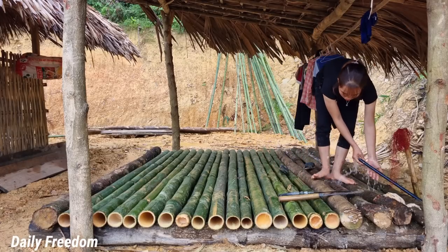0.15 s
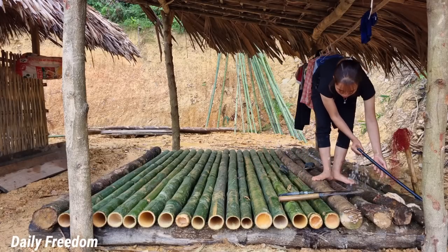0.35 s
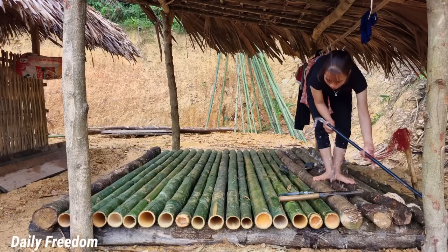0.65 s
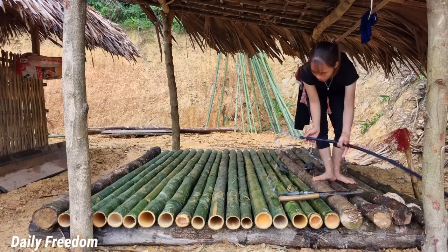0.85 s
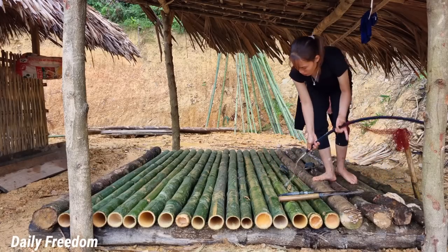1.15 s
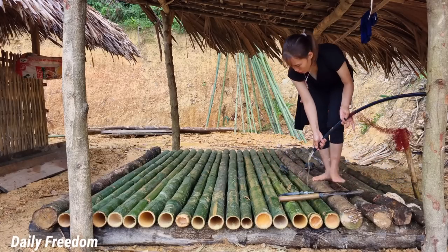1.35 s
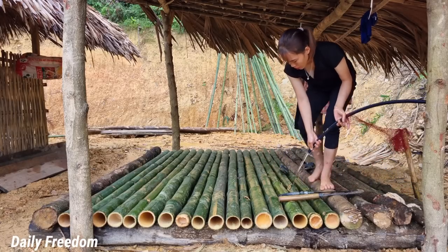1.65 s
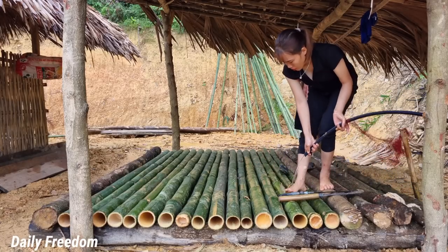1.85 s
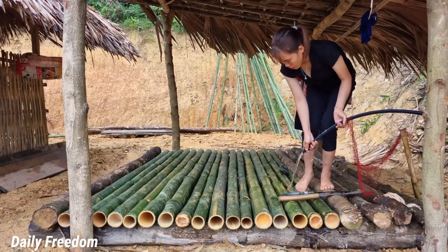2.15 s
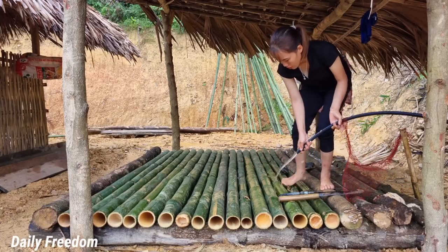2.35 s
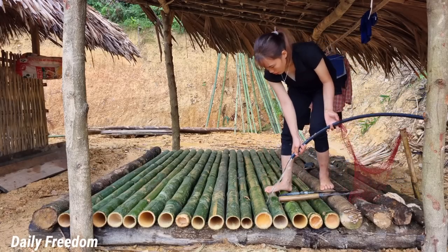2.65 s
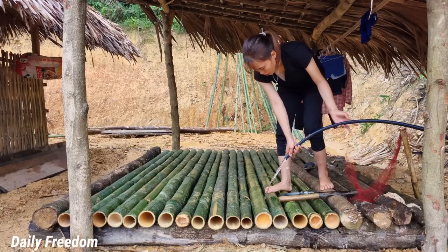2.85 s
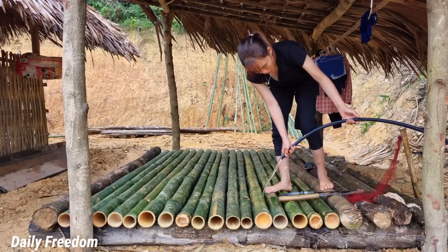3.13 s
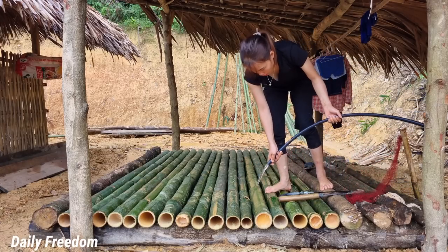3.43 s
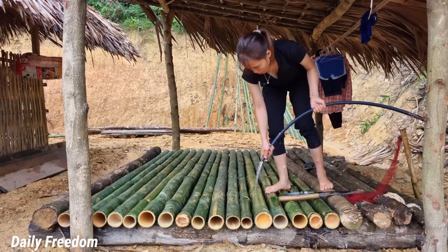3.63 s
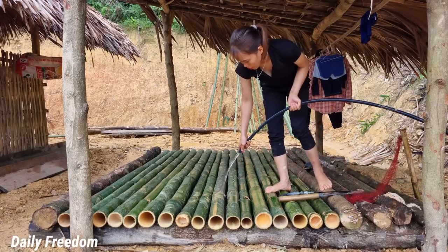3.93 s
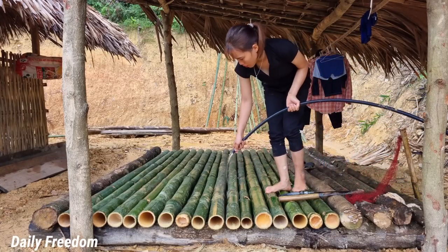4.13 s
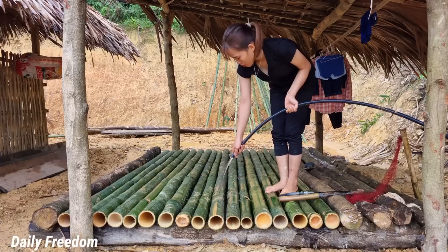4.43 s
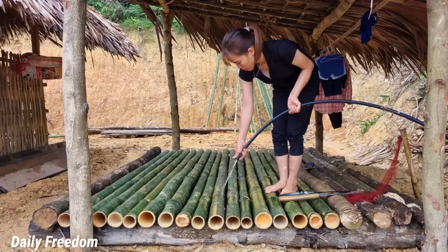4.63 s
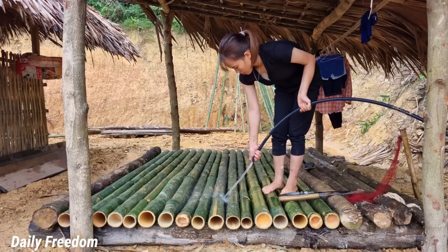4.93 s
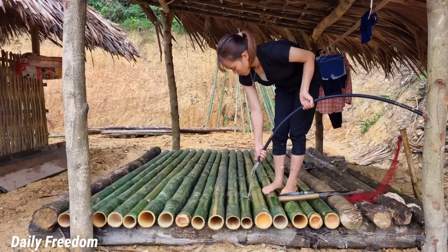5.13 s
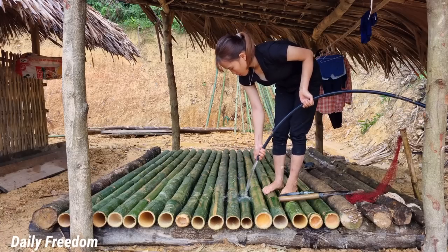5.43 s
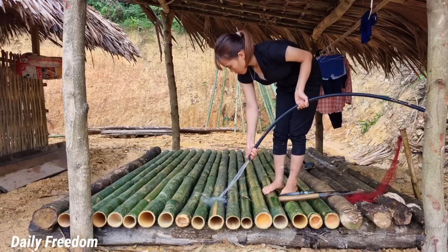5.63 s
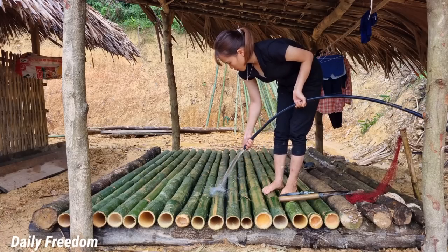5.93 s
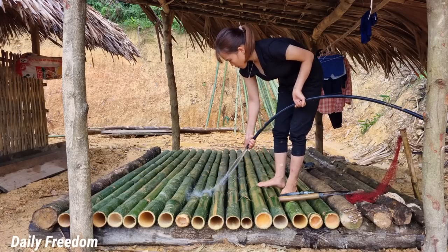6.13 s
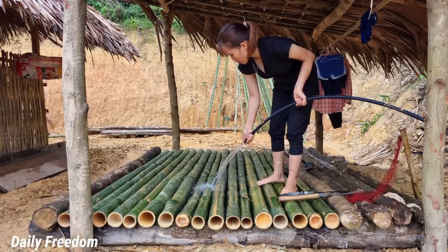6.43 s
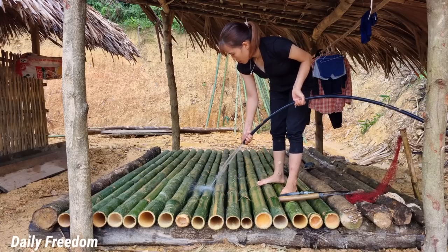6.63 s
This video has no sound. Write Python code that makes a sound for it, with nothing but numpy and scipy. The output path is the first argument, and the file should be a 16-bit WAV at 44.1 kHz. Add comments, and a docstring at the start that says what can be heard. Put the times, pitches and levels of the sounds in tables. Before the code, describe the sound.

Soft, unsteady water spray on hollow bamboo, outdoors and dry, heard from nearby in stereo. It starts thin and quiet, with droplets, tiny gurgles and watery plinks. Short low bumps from shifting feet sound near one second, and the heaviest thud near two. The jet swells just before four seconds, thins again, then from about five seconds turns brighter and spits rapid crisp slaps and narrow squirts until the end.

```python
"""A hose jet hisses and patters over a floor of whole bamboo poles under a thatched shelter.
The spray is shaped noise with droplet and gurgle tones; the poles drum as resonating noise.
Bubbles plink as gliding sines, squirts are narrow hiss, slaps of water are cracks with a splash.
Bare feet shift on the hollow poles and knock them in short, dull tones; the thatch adds scatter."""
import sys
import numpy as np
from scipy import signal
from scipy.fft import rfft, irfft
from scipy.io import wavfile
from scipy.ndimage import uniform_filter1d

SR = 44100
rng = np.random.default_rng(int(sys.argv[2]) if len(sys.argv) > 2 else 0)


def persist_wave(psi):
    """Save psi, clipped to +-1, as 16-bit WAV."""
    counts = np.round(np.clip(psi, -1, 1) * 32767).astype(np.int16)
    wavfile.write(sys.argv[1], SR, np.atleast_2d(counts).T)


N = 298557  # length in samples

REST_DB = -55  # resting force of the jet


def amp(db):
    """Turn decibels into a plain multiplier."""
    return 10 ** (np.asarray(db) / 20)


def evened(x):
    """Scale a sound to an rms (average strength) of 1."""
    return x / np.sqrt(np.mean(x ** 2) + 1e-20)


def read(points, hz):
    """Read a table of (Hz, value) at any pitch, with pitch on a logarithmic scale."""
    f, value = np.transpose(points)
    return np.interp(np.log(hz + 1), np.log(f + 1), value)


def curves(rows, t):
    """Join the rows of a table with straight lines over time, one curve per column."""
    seconds, *columns = np.transpose(rows)
    return [np.interp(t, seconds, column) for column in columns]


def add(mix, s, sound):
    """Lay a sound into the mix at s seconds, cut off at the end."""
    part = mix[:, round(s * SR):][:, :sound.shape[1]]
    part += sound[:, :part.shape[1]]


def sides(pan_db):
    """Left and right multipliers; a positive pan makes the left louder."""
    return amp(np.array([pan_db / 2, -pan_db / 2]))


def filtered(x, order, edge_hz, kind):
    """Keep only the part of a sound that lies on the wanted side of the edges."""
    return signal.sosfilt(signal.butter(order, edge_hz, kind, fs=SR, output="sos"), x)


def resonance(x, hz, width):
    """Let one pitch ring out of a sound, as a hollow does; width in Hz."""
    return signal.lfilter(*signal.iirpeak(hz, hz / width, SR), x)


# How alike the noise is on the left and right.
# Each row: pitch in Hz, likeness from 0 to 1.
LIKENESS = [(60, 0.5), (130, 0.91), (290, 0.71), (640, 0), (1400, 0), (3100, 0.29), (15000, 0.)]


def pair_noise():
    """Two channels of noise, most alike in the bass and mostly unrelated in the treble."""
    a, b = rfft(rng.standard_normal((2, N)))
    same = np.clip(read(LIKENESS, np.fft.rfftfreq(N, 1 / SR)), 0, 1)
    right = same * a + np.sqrt(1 - same ** 2) * b
    return evened(irfft([a, right], N))


def grains(per_s, spread_db, lo_hz, hi_hz, cycles, rise, lag_s, count):
    """Sparse trains of short dying tones; each kind comes from its own side, a few are large."""
    size = amp(spread_db * np.minimum(rng.exponential(1, N), 5))
    size *= rng.random(N) < per_s / SR
    kind = rng.integers(0, count, N)
    out = np.zeros((2, N))
    for k, hz in enumerate(np.geomspace(lo_hz, hi_hz, count)):
        u, v, w = rng.random(3)
        starts = np.array([[lag_s * 2 * u + 0.0002506], [2e-4]])  # the left side starts later
        turns = hz * (np.arange(2400) / SR - starts).clip(0)
        life = turns / (cycles * (.5 + v))
        tone = life * np.exp(-3 * life) * np.sin(2 * np.pi * turns * (1 + rise * life))
        tone *= sides(4.3 * (w - .5))[:, None] / np.linalg.norm(tone[1])
        out += signal.oaconvolve((size * (kind == k))[None], tone, axes=1)[:, :N]
    return evened(out)


# The jet on the poles.
# Each row: time in seconds, force in dB, fineness of the mist in dB.
JET_FORCE = [(0.0, -49.5, -8), (0.19, -53, -4.5), (0.24, -50, -4.5), (0.3, -52.5, -4), (0.5, -52.5, -5.5),
             (0.74, -53.5, -7.5), (0.813, -51, -1), (0.94, -52.5, -7), (1.03, -50.5, -4), (1.1, -49, -2.5),
             (1.2, -47, -7), (1.236, -48.5, -5), (1.437, -54.5, -5.5), (1.6, -53.5, -7), (1.64, -54, -3.5),
             (1.81, -53.5, -8.5), (1.91, -47.5, -5.5), (2.13, -55.5, -6.5), (2.4, -54.5, -7.5),
             (2.461, -52, -1.5), (2.516, -53.5, -8), (2.673, -48.5, -5), (2.795, -53.5, -6),
             (3.09, -56, -6), (3.204, -52, -2.5), (3.368, -52.5, -5.5), (3.603, -48, -3.5),
             (3.807, -43.5, -3.5), (4.023, -47, -2.5), (4.081, -54, -3), (4.152, -57.5, -6.5),
             (4.28, -50.5, -7), (4.481, -55, -5), (4.644, -55, -8.5), (4.82, -55, -6), (4.865, -50.5, -7),
             (4.885, -48.5, 4), (4.91, -43, 1), (4.997, -44, 1.5), (5.062, -53, -4), (5.24, -55, -7),
             (5.34, -45.5, -5.5), (5.425, -49, -6.5), (5.47, -48, 1), (5.589, -46, 1.5), (5.624, -48, -8),
             (5.657, -48.5, 1), (5.738, -46.5, -1), (5.804, -54.5, -7), (5.869, -50.5, -4.5),
             (5.92, -43.5, -3), (5.988, -48.5, -2.5), (6.087, -44.5, -6), (6.13, -49.5, -2),
             (6.24, -43.5, -0.5), (6.304, -50.5, 0), (6.367, -46, -8), (6.4, -48, 0), (6.486, -45, -1),
             (6.77, -45, -2.5)]
# Tone colour of the spray within its low, middle and high bands.
# Each row: pitch in Hz, relative level per Hz in dB.
SPRAY_COLOUR = [(450, -3.5), (650, -7), (850, -11.5), (1100, -3), (1600, -4.5), (2300, -3), (3000, -1.5),
                (5000, -0.5), (6800, -2.5), (7700, 0), (8600, -2.5), (11500, -4), (14700, -2), (15600, -1)]
# Form of the stream.
# Each row: time in seconds, share landing as separate droplets from 0 to 1,
# level of the low band at resting force in dB.
STREAM_FORM = [(0, 0.07, -61.5), (.5, 0.15, -57.5), (1, 0.07, -59), (1.5, 0.05, -59.5), (2.3, 0.24, -59),
               (3.3, 0, -58), (3.6, 0.11, -57), (4.05, 0.1, -56.5), (4.15, 0.07, -60.5), (4.3, 0.17, -58),
               (4.9, 0.1, -60), (5.3, 0.05, -60.5), (5.6, 0.46, -61.5), (5.82, 0, -59), (6, 0.21, -62.5),
               (6.4, 0.07, -63.5), (6.77, 0.13, -64.5)]
GURGLE_DB = -14.5  # small overlapping bubbles against the hiss, before the spectrum is flattened
LOW_FOLLOWS = 0.8  # dB of low band per dB of force
REST_PAN_DB, PAN_PER_DB = -8.5, 0.54  # a harder jet lands nearer the middle


def spray(patchy_db=1.92, flicker_db=1.0):
    """Mist hiss, droplets and gurgle; a fine jet lifts the top band, a full stream the low band."""
    beads = grains(1100., 3.33, 2910.0, 10700.0, 2.07, 0.041, 5e-5, count=20)
    gurgle = grains(260., 2.2, 720.0, 1815.0, 22.8, 0.0775, 0.00018, count=16)
    drops = np.clip(curves(STREAM_FORM, np.arange(N) / SR)[0], 0, 1)
    drive = np.sqrt(1 - drops) * pair_noise() + np.sqrt(drops) * beads + amp(GURGLE_DB) * gurgle

    # Split into short moments and pitches, then flatten the spectrum
    hz, t, z = signal.stft(drive, SR, nperseg=256, noverlap=192)
    power = (abs(z) ** 2).mean(2)
    z *= np.sqrt(power.mean() / uniform_filter1d(power, size=5, axis=1))[:, :, None]

    force_db, fine_db = curves(JET_FORCE, t)
    above_rest_db = force_db - REST_DB
    full_db = curves(STREAM_FORM, t)[1] + LOW_FOLLOWS * above_rest_db - force_db

    # Chance patches in time and pitch; gobs of water light up all bands together
    patches = rng.standard_normal((len(t), len(hz), 2)).T
    patches = uniform_filter1d(patches, size=4, axis=1)
    patches = evened(uniform_filter1d(patches, size=24, axis=2))
    flicker = evened(uniform_filter1d(rng.standard_normal(len(t)), size=8))

    high = np.clip((hz - 8000) / 1800, 0, 1)[:, None]
    low = np.clip((3000 - hz) / 900, 0, 1)[:, None]
    wide_db, narrow_db = 10 * np.log10(SR / np.array([6500, 1600]))  # band level to level per Hz
    band_db = (1 - high - low) * wide_db + high * (fine_db + wide_db) + low * (full_db + narrow_db)
    colour_db = read(SPRAY_COLOUR, hz)[:, None]
    z *= amp(colour_db + band_db + force_db + patchy_db * patches + flicker_db * flicker)

    # How much of the pan each pitch takes on; the housing shades the mid treble most
    facing = np.interp(hz, [600, 3500, 9000, 13000], [0.037, 0.63, 0.71, 0.3])[:, None]
    pan_db = REST_PAN_DB + PAN_PER_DB * above_rest_db
    z *= (hz[:, None] > 400) * sides(pan_db * facing)
    return signal.istft(z, SR, nperseg=256, noverlap=192)[1][:, :N]


# Hollow modes of the bamboo, the pitches at which it rings.
# Each row: pitch in Hz, width in Hz, level in dB.
POLE_MODES = [(149, 48, -1.5), (245, 67, 2), (339, 88, 0.5), (520, 103, -3.5), (800, 230, -56)]
# Weight shifting on the poles.
# Each row: start in seconds, time to fade by 60 dB in seconds, hollow level in dB, deep level in dB.
WEIGHT_SHIFTS = [(0.56, .6, -62, -63), (0.73, 1.1, -66, -76), (0.85, 1.8, -55, -74),
                 (1.09, 2.1, -57.5, -70), (1.52, .5, -59.5, -69), (1.895, 0.76, -57, -54),
                 (1.93, 0.69, -50.5, -63), (2.5, 1, -64, -62), (3.06, 0.4, -61, -74),
                 (3.27, 0.84, -59.5, -69), (3.86, 1.1, -56, -72), (5.48, .4, -72, -69),
                 (6.1, 2.5, -61.5, -72)]
DRUM_DB, BOOM_DB = -65, -75.5  # hollow and deep part under the jet at resting force
DRUM_FOLLOWS, WOBBLE_DB = 0.33, 1  # dB per dB of force; size of the slow wobble
SHIFT_RISE_S = 0.0075


def poles():
    """Shaking by jet and shifting weight rings the hollow modes; the deck booms below them."""
    t = np.arange(N) / SR
    wobble = uniform_filter1d(rng.standard_normal(N), size=4000)
    wobble = evened(uniform_filter1d(wobble, size=4000))
    above_rest_db = curves(JET_FORCE, t)[0] - REST_DB
    jet_power = amp(DRUM_FOLLOWS * above_rest_db + WOBBLE_DB * wobble) ** 2
    hollow_power = jet_power * amp(2 * DRUM_DB)
    deep_power = jet_power * amp(2 * BOOM_DB)
    for s, t60, hollow_db, deep_db in WEIGHT_SHIFTS:
        since = (t - s).clip(0)
        swell = (np.minimum(since / SHIFT_RISE_S, 1) * amp(-60 * since / t60)) ** 2
        hollow_power += amp(2 * hollow_db) * swell
        deep_power += amp(2 * deep_db) * swell

    shake = pair_noise()
    hollow = np.zeros((2, N))
    for k, (hz, width, db) in enumerate(POLE_MODES[:4]):
        hollow += (-1) ** k * amp(db) * evened(resonance(shake, hz, width))
    hollow = evened(filtered(hollow, 2, [110, 600], "bandpass"))
    deep = evened(filtered(shake, 3, [50, 125], "bandpass"))
    return np.sqrt(hollow_power) * hollow + np.sqrt(deep_power) * deep * sides(2.1)[:, None]


FAINT_PER_S, FAINT_DB, FAINT_SPREAD_DB = 22, -62.5, 3  # middle level, and most it strays either way
FAINT_GLIDE = .14  # largest fall in pitch as a share; the largest rise is twice this


def faint_plinks():
    """Rows of weak bubbles at chance times and pitches, mostly gliding up."""
    when, size, pitch, glide, long = rng.random((round(FAINT_PER_S * N / SR), 5)).T
    db = FAINT_DB + FAINT_SPREAD_DB * (2 * size - 1)
    first_hz = 720 * 2.5 ** pitch
    last_hz = first_hz * (1 + FAINT_GLIDE * (3 * glide - 1))
    return list(zip(when * N / SR, db, first_hz, last_hz, .02 + .08 * long ** 2))


# The clearest bubbles and drips in the run-off.
# Each row: start in seconds, level in dB, first pitch in Hz, last pitch in Hz, length in seconds.
CLEAR_PLINKS = [(0.028, -61, 898, 912, 0.057), (0.221, -58, 658, 520, 0.069),
                (0.279, -58.5, 990, 1160, 0.049), (0.303, -54, 735, 604, 0.073),
                (0.371, -54, 1300, 1290, 0.024), (0.544, -56, 1020, 1000, 0.032),
                (0.599, -58, 680, 1186, 0.054), (0.626, -54.5, 1390, 1480, 0.048),
                (0.854, -56.5, 864, 970, 0.09), (1.102, -51.5, 1014, 980, 0.06),
                (1.387, -59, 1060, 1180, 0.033), (1.48, -53.5, 1746, 1680, 0.028),
                (1.501, -52, 1400, 1370, 0.029), (1.862, -53, 1240, 1480, 0.035),
                (2.097, -54, 1160, 1140, 0.026), (2.18, -57, 880, 880, 0.024),
                (2.279, -61, 635, 744, 0.085), (2.333, -60, 760, 800, 0.042),
                (2.292, -58, 1085, 1110, 0.033), (2.393, -58.5, 702, 816, 0.065),
                (2.45, -55, 1324, 1290, 0.03), (2.61, -62, 938, 956, 0.075),
                (2.653, -46.5, 2020, 1860, 0.034), (2.695, -49.5, 1084, 1050, 0.04),
                (2.894, -51, 2080, 1950, 0.014), (3.109, -51.5, 657, 974, 0.055),
                (3.187, -54, 962, 1036, 0.085), (3.415, -57, 1120, 1100, 0.044),
                (3.46, -55, 1334, 1370, 0.033), (3.479, -53, 775, 780, 0.049),
                (3.512, -50.5, 1000, 940, 0.027), (3.623, -54, 1310, 1377, 0.053),
                (3.653, -49, 853, 975, 0.035), (3.805, -51, 1445, 1490, 0.022),
                (4.148, -54.5, 788, 775, 0.04), (4.283, -54.5, 1434, 1340, 0.041),
                (4.352, -50, 794, 800, 0.049), (4.48, -47, 1280, 1330, 0.0087),
                (4.65, -55.5, 1060, 1060, 0.03), (4.723, -56.5, 986, 1030, 0.087),
                (4.802, -50.5, 1000, 925, 0.031), (4.883, -53, 1780, 1770, 0.1),
                (5.025, -61, 1062, 1170, 0.09), (5.237, -52, 1155, 1110, 0.031),
                (5.325, -50, 1690, 1710, 0.053), (5.44, -58, 1220, 1160, 0.041),
                (5.714, -54, 710, 646, 0.047), (5.732, -54, 1096, 1186, 0.051),
                (5.762, -47, 1650, 1670, 0.018), (5.827, -52.5, 870, 894, 0.029),
                (6.005, -52, 1570, 1630, 0.045), (6.064, -51, 1820, 1690, 0.066),
                (6.092, -47.5, 837, 856, 0.066), (6.372, -52, 1320, 1300, 0.025),
                (6.43, -49.5, 1203, 1186, 0.033), (6.622, -56, 1073, 967, 0.12),
                (6.666, -52.5, 622, 675, 0.033), (6.719, -47.5, 1450, 1440, 0.012)]


def plinks(mix):
    """Each bubble rings as an unsteady sine that glides, swells fast, flutters and fades."""
    for s, db, first_hz, last_hz, length in CLEAR_PLINKS + faint_plinks():
        life = np.arange(0, 1, 1 / (length * SR))
        unsteady = uniform_filter1d(rng.standard_normal((2, SR // 4)), size=160, axis=1)
        waver, flutter = unsteady[:, :len(life)]
        hz = (first_hz + (last_hz - first_hz) * life) * (1 + 0.56 * waver)
        turns = np.cumsum(hz) / SR
        lead = np.array([[0], [0.00016 * first_hz]]) * rng.uniform(0.12, 1.35)  # right is ahead
        swell = np.sin(np.pi * life ** 0.57) * (1 + 5.4 * flutter)
        tone = np.sin(2 * np.pi * (turns + lead))
        add(mix, s, amp(db) * swell * tone * sides(-0.68)[:, None])


# Brief squirts where water is squeezed through a gap.
# Each row: start in seconds, level of the hiss before its swell in dB, centre pitch in Hz,
# length in seconds.
GAP_SQUIRTS = [(0.077, -44.5, 3260, 0.06), (0.596, -50.5, 4390, 0.022), (0.784, -47.5, 4700, 0.04),
               (1.011, -44, 3340, 0.036), (1.882, -53, 1900, 0.091), (2.337, -49.5, 3850, 0.036),
               (2.702, -51, 3550, 0.042), (3.442, -52, 4950, 0.028), (4.498, -49, 3740, 0.03),
               (4.909, -34, 4800, 0.014), (5.508, -47, 5130, 0.061), (5.551, -48, 5030, 0.039),
               (6.045, -43.5, 5080, 0.035), (6.244, -42, 4570, 0.015), (6.353, -43, 5050, 0.032),
               (6.629, -42.5, 3860, 0.027)]


def squirts(mix, breadth=0.3):
    """Hiss narrowed by the gap it is forced through."""
    for s, db, hz, length in GAP_SQUIRTS:
        hiss = rng.standard_normal((2, SR // 8))
        for _ in range(2):
            hiss = resonance(hiss, hz, breadth * hz)
        swell = np.sin(np.pi * np.arange(0, 1, 1 / (length * SR)) ** 0.5)
        add(mix, s, amp(db) * evened(hiss)[:, :len(swell)] * swell * sides(-0.75)[:, None])


# Slugs of water landing.
# Each row: start in seconds, level in dB, pitch in Hz, added level of the top edge in dB,
# level of the splash after it in dB.
WATER_SLAPS = [(0.086, -31.5, 3560, -23, -10.5), (0.2389, -44, 3330, -10, -15), (0.8132, -22, 7350, -9, -9),
               (0.967, -24, 7540, -12, -22), (0.9739, -29.5, 6980, 9, -17), (0.9759, -16, 6630, -17, -10.5),
               (1.0395, -31, 7800, -5, -31), (1.124, -37, 5000, -8, -4), (1.1392, -17, 7600, -14, -16),
               (1.145, -19, 5450, -3.5, -7), (1.523, -39, 3860, -13, 0), (3.1976, -36.5, 3970, -8, -4),
               (3.967, -31, 3190, -13, -6), (4.835, -34.5, 6000, 1, -17), (4.8757, -26.5, 7840, -2, -17),
               (4.889, -25, 7750, -8, -18), (4.9005, -21, 8000, -2, -24), (4.933, -22, 8060, 5, -29),
               (5.0933, -38, 8440, 10.5, -24), (5.3258, -28, 4900, -23, -7), (5.346, -34, 6100, -12, -6),
               (5.365, -32, 6200, -19, -8), (5.4844, -20, 7700, -14, -41), (5.517, -26, 7000, -5, -31),
               (5.567, -24, 7450, -16, -7.5), (5.5965, -30.5, 4730, -6, -9), (5.6486, -29, 7320, 11, -31),
               (5.6879, -29, 8270, 3, -29), (5.9286, -29, 6300, -11, -24), (5.7376, -22.5, 7900, -9, -27),
               (5.7639, -31, 7750, 5.5, -21), (6.083, -22, 7860, -4, -11), (6.0948, -26.5, 4820, -10, -27),
               (6.147, -25.5, 7700, 1, -20), (6.2049, -26, 7490, -17, -34), (6.213, -23.5, 7410, 5, -30),
               (6.234, -26, 6290, 1, -33), (6.2493, -24.5, 4500, -10, -37), (6.3158, -23, 6300, 5, -40),
               (6.343, -30, 5540, -11, -25), (6.364, -22, 7840, -14, -14), (6.367, -23, 7800, 0, -17),
               (6.377, -22, 7440, 3, -27), (6.454, -23.5, 7400, -4, -37), (6.4674, -27, 6360, 8, -33),
               (6.4837, -19.5, 6400, -15, -35), (6.5154, -26.5, 6400, 15, -40),
               (6.555, -20, 6950, -22, -28), (6.576, -25.5, 4040, -18, -25), (6.6022, -24, 5900, 4, -31),
               (6.6315, -21, 7460, 1, -20), (6.668, -28, 8100, -12, -18), (6.7052, -30, 8000, -3, -27),
               (6.737, -22.5, 4860, -23, -14)]
SLAP_PAN_DB, TOP_PAN_DB = -7, -1.5
SPLASH_T60_S = 0.013  # time for the splash to fade by 60 dB
SPATTER_DB, SPATTER_T60_S = -5, 0.13  # slower rain of drops, level against the splash


def slaps(mix):
    """A crack of a few cycles as the slug lands, then the noisy scatter of its splash."""
    t = np.arange(9000) / SR
    late = (t - np.array([[5e-5], [0]])).clip(0)  # the right side hears it first
    tail = amp(-60 * t / SPLASH_T60_S) + amp(SPATTER_DB - 60 * t / SPATTER_T60_S)
    for s, db, hz, top_db, splash_db in WATER_SLAPS:
        noise = rng.standard_normal((2, len(t)))
        crack = np.sin(2 * np.pi * hz * late) * late / 0.00023 * np.exp(1 - late / 0.00023)
        impact = 0.5 * late / 0.0012 * np.exp(1 - late / 0.00039)
        burst = noise * (impact + amp(splash_db) * tail * (late > 0))
        body = filtered(burst, 2, [2000, 9000], "bandpass")
        top = 2 * amp(top_db) * filtered(burst, 2, 9000, "highpass")
        slap = sides(SLAP_PAN_DB)[:, None] * (crack + body) + sides(TOP_PAN_DB)[:, None] * top
        add(mix, s, amp(db) * slap)


# Knocks of feet and hose on the poles.
# Each row: start in seconds, level in dB, pitch in Hz.
POLE_KNOCKS = [(0.6, -50, 310), (0.738, -39, 365), (0.781, -47, 274), (0.815, -48.5, 435),
               (0.858, -44, 253), (0.882, -39.5, 228), (0.918, -43, 194), (0.945, -50, 346),
               (1.093, -43, 450), (1.104, -57, 237), (1.136, -40.5, 250), (1.168, -43.5, 217),
               (1.368, -51, 310), (1.871, -50, 344), (1.898, -36, 66), (1.944, -39, 78), (1.932, -38, 331),
               (1.94, -35, 253), (1.97, -40, 300), (1.99, -49, 245), (2.03, -48, 240), (2.49, -51, 254),
               (2.636, -50, 245), (3.928, -42, 250)]
HEAVY_DB, HEAVY_RING = -43.5, 0.93  # blows above this level ring longer, dB of ring time per dB
KNOCK_T60_S, HARD_DB = 0.037, 0.5  # for light blows: fade by 60 dB, level of the upper modes


def knocks(mix):
    """A dull blow: a short tone at its own pitch that also rings the upper hollow modes."""
    t = np.arange(9000) / SR
    upper = np.zeros(len(t))
    for hz, width, db in POLE_MODES[2:]:
        upper += amp(db) * np.exp(-np.pi * width * t) * np.sin(2 * np.pi * hz * t)
    upper /= abs(upper).max()
    for s, db, hz in POLE_KNOCKS:
        heavy_db = max(db - HEAVY_DB, 0)
        t60 = KNOCK_T60_S * amp(HEAVY_RING * heavy_db)
        tone = amp(-60 * t / t60) * np.sin(2 * np.pi * hz * t)
        blow = tone + amp(HARD_DB - heavy_db) * upper  # heavy blows are duller
        onset = 1 - np.exp(-t / (0.00061 + 0.001 * heavy_db))
        add(mix, s, amp(db) * onset * blow * sides(.4)[:, None])


def shelter(x, t60=0.055):
    """Short scatter from thatch and posts: sparse taps of random sign, other taps per side."""
    t = np.arange(6000) / SR
    taps = rng.choice([-1., 1.], (2, len(t))) * (rng.random((2, len(t))) < .05)
    taps *= amp(-60 * t / t60) * (t > .002)
    taps = filtered(taps, 2, 200., "highpass")  # the scatter carries no bass
    return signal.oaconvolve(x, taps / np.linalg.norm(taps[0]), axes=1)[:, :N]


def scene():
    """Mix the single hits with their scatter, the spray and the drumming poles."""
    hits = np.zeros((2, N))
    plinks(hits)
    squirts(hits)
    slaps(hits)
    knocks(hits)
    return spray() + poles() + hits + amp(-8.5) * shelter(hits)


def record(dry):
    """The microphone's bass cut, then the limit at the top of the treble."""
    cut = filtered(dry, 2, 40., "highpass")
    treble_limit = signal.firwin(511, 15600, window=("kaiser", 9), fs=SR)
    return signal.oaconvolve(cut, treble_limit[None], "same")


dry = scene()
out = record(dry)
persist_wave(out)
```